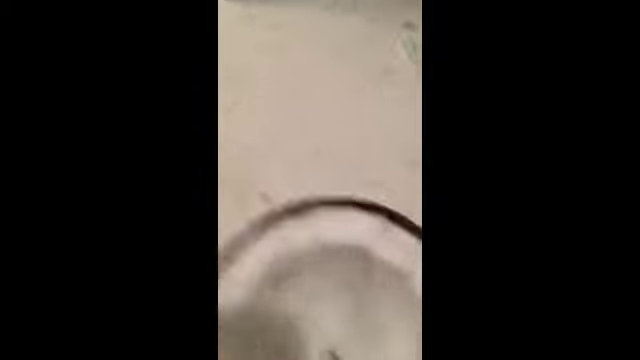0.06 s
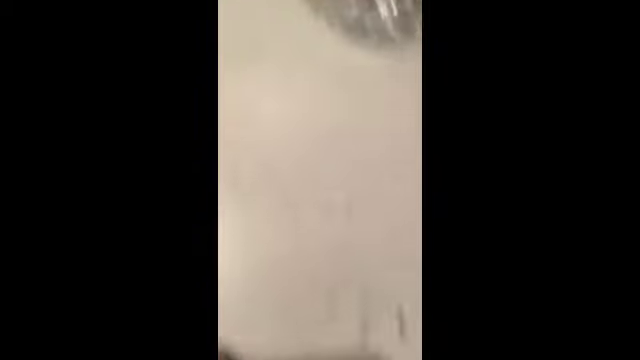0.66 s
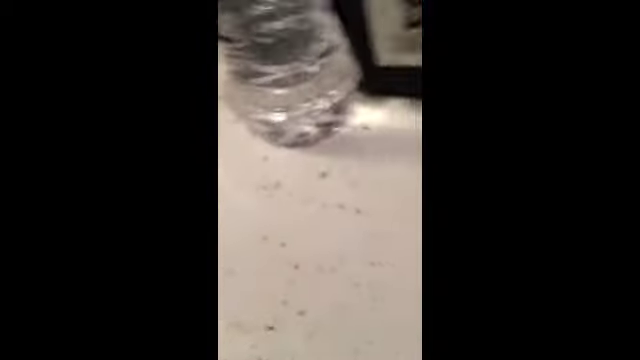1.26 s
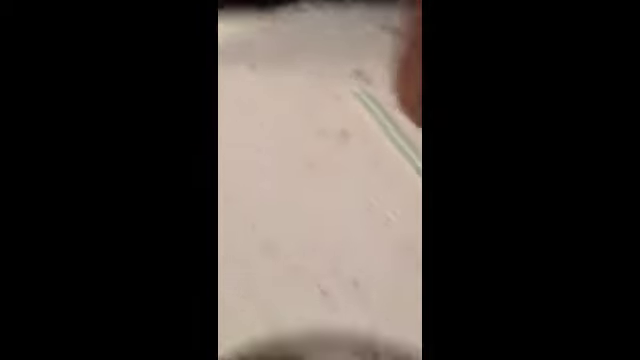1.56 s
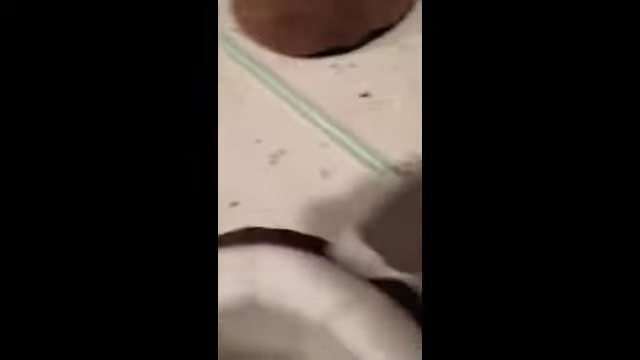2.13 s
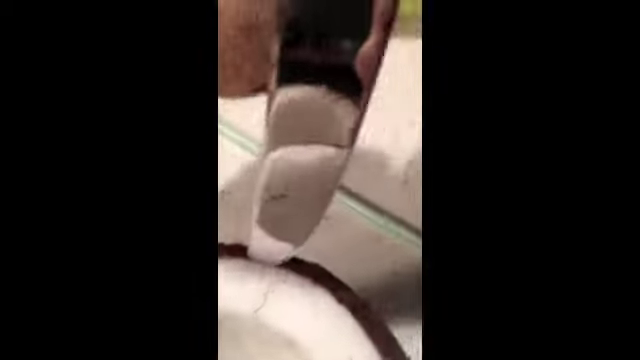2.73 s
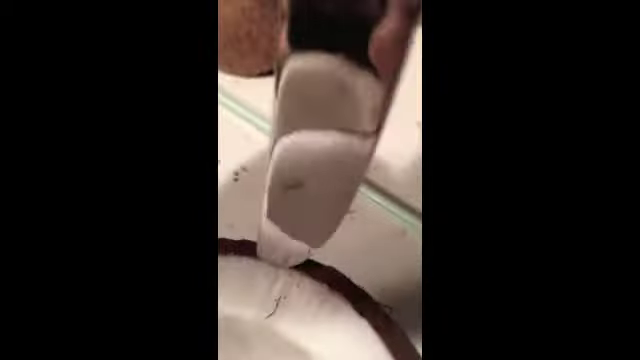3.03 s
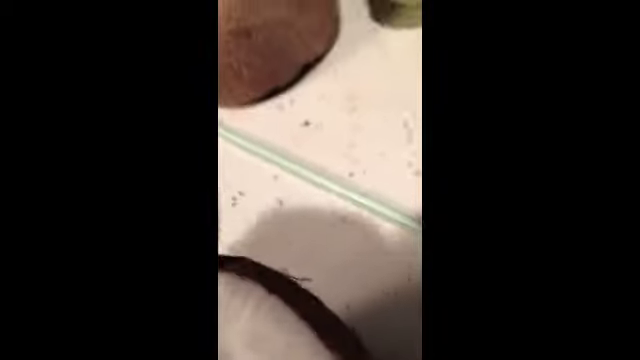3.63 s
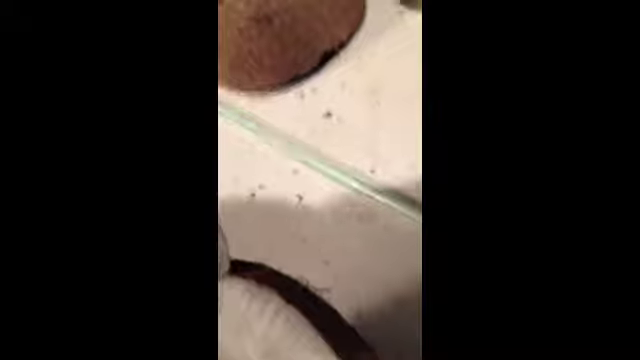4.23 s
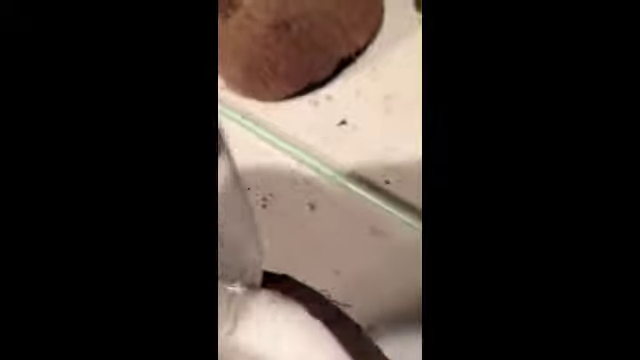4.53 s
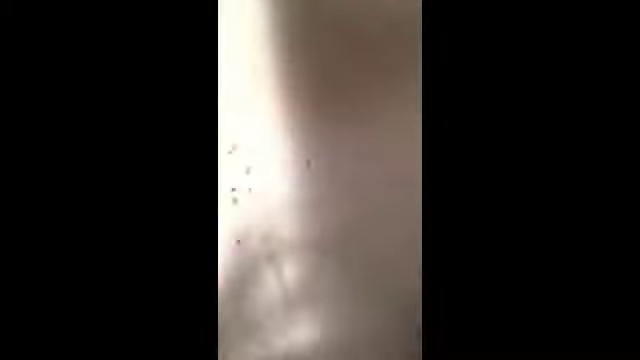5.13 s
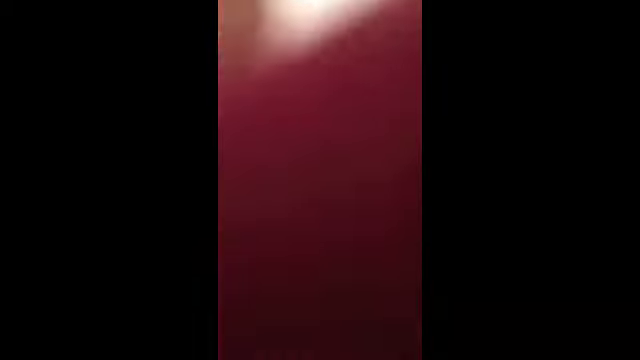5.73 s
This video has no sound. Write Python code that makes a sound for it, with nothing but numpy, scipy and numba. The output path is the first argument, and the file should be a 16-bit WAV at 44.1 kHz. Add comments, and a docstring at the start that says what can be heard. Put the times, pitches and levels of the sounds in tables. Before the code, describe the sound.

A knife scrapes into coconut flesh with a thin metallic ring, then the flesh cracks loose and the shell knocks on a counter.

```python
"""At a kitchen counter, a knife works into the flesh of a halved coconut, close to a hand-held phone.
The blade sticks and slips, which makes it ring. It sinks deeper in jerks, then levers until
the flesh tears and snaps off the shell. The shell knocks on the counter, fingers rub and bump
the phone, and the small kitchen echoes and murmurs behind."""
import sys
import numpy as np
from scipy import signal
from scipy.fft import rfft, irfft
from scipy.io import wavfile
from scipy.ndimage import uniform_filter1d
from numba import njit

SR = 44100
rng = np.random.default_rng(int(sys.argv[2]) if len(sys.argv) > 2 else 0)


def master_out(mix):
    """Clip the mix to full scale and print it as 16-bit PCM to the path in sys.argv[1]."""
    frames = np.transpose(np.atleast_2d(mix))
    ceiling = np.clip(frames, -1, 1)
    pcm = np.round(ceiling * 32767).astype(np.int16)
    wavfile.write(sys.argv[1], SR, pcm)


N = 259043
T = np.arange(N) / SR
HIT_T = T[:SR // 3]  # time within one short hit
BITE_S, SINK_S = 3.9, .68  # the blade starts to sink in; how long it takes to be buried
LEVER_S, RUPTURE_S = 4.745, 4.957  # levering starts; the flesh breaks away


def scrape():
    """The blade rings as it sticks and slips on wet flesh; sinking in damps and shifts its tones."""
    # blade tones: free f/Hz, buried f/Hz, base width/Hz, free gain/dB, buried gain/dB
    blade = [(850, 700, 390, -5, 1), (1340, 1240, 280, -8.5, -4), (2500, 3030, 240, -10.5, -6.5),
             (3990, 3930, 105, -7, -6), (4900, 4640, 165, -4.5, -11), (6340, 6780, 140, 1.5, -2),
             (6960, 7100, 580, -6, -9), (8000, 8930, 380, -3, -1), (8670, 9700, 150, 3.5, -25),
             (10040, 10700, 490, 3.5, -18), (11500, 11450, 320, 2.5, -0.5), (11900, 12600, 340, -14, 2),
             (12200, 11800, 400, -1, -1.5), (13950, 14100, 260, 1, -9), (14500, 14800, 500, -6, -3)]
    force, jerk = effort()
    depth = np.clip((T - BITE_S) / SINK_S, 0, 1)
    # the tip grates on the surface; the buried blade slides smoothly
    slips = force * (np.sqrt(1 - depth) * grains(1500, 3.3) + np.sqrt(depth) * grains(14000, 2.5))
    slips += jerk * grains(9000, 2.5)
    # a hard jerk bends the whole blade and brings out its lower tones
    slips += 1.4 * np.tanh(jerk / undb(-28)) * band(slips, 4200, 1240)
    out = undb(-9) * butter(slips, 1730, "high")
    for free_hz, buried_hz, base_width, free_db, buried_db in blade:
        hz = free_hz + depth * (buried_hz - free_hz)
        width = 2.4 * base_width * (1 + .52 * depth)
        gain = undb(free_db + depth * (buried_db - free_db))
        out += gain * band(band(slips, hz, width), hz, width)
    flesh_hiss = undb(-17) * butter(force * grains(9000, 3), 1730, "high")
    return undb(4.3) * (out + flesh_hiss)


def effort():
    """The hand's steady push, and the jerks on top of it: chatter, catches and lunges."""
    # pushes through the flesh: start t/s, length/s, level/dB, amount of chatter (0-1)
    strokes = [(3.14, .08, -65.5, .15), (3.296, .2, -61, 1), (3.497, .085, -53.5, .1), (3.6, .07, -67, .1),
               (3.724, .105, -54.5, .7), (3.929, .14, -62, .35), (4.074, .095, -56.5, .3),
               (4.17, .405, -50.5, 0), (4.58, .19, -54.5, 0)]
    # the tip catches hard and lets go: t/s, level/dB
    catches = [(3.296, -50), (3.689, -50), (3.7108, -41.5), (3.746, -40), (3.761, -42), (4.074, -50),
               (4.799, -32)]
    # the flesh gives and the blade lunges deeper: t/s, level/dB, rise/s
    lunges = [(4.215, -25.5, .002), (4.224, -31, .0055), (4.366, -33.5, .015), (4.719, -34, .007)]
    chatter_hz, slip_fall_s = 52, .0026
    force, jerk = np.zeros(N), np.zeros(N)
    cycles = np.cumsum(chatter_hz * (1 + .2 * walk(40))) / SR
    for s, length, db, chatter in strokes:
        force += undb(db) * held(s, length, attack=.008, release=.018)
        since_slip = (cycles - cycles[int(s * SR)]) % 1 / chatter_hz
        pushing = (T >= s) & (T < s + length)
        jerk += chatter * undb(db + 10) * np.exp(-since_slip / slip_fall_s) * pushing
    jerk += sum(undb(db) * swell(s, .0004, slip_fall_s) for s, db in catches)
    for s, db, rise in lunges:
        jerk += undb(db) * swell(s, rise, 1.25 * rise)
        force += undb(db - 21) * swell(s, .022, .022)  # the blade creeps before and after
    return force * undb(2 * walk(160)), jerk


def tear():
    """Fibres part in a dense crackle; the bigger breaks make the hollow shell ring."""
    # smaller rips before and after the main break: t/s, level/dB, rise/s, fall/s
    small_rips = [(3.52, -57, .018, .05), (4.775, -43, .01, .015), (5.033, -38, .025, .008),
                  (5.08, -38, .008, .022)]
    fibres, breaks = grains(3500, 3.2), grains(1200, 3.1)
    hollow = band(breaks, 524, 230) + 1.06 * band(breaks, 924, 280)
    hollow += .2 * band(breaks, 1570, 410) + .21 * band(breaks, 2420, 400)
    deep = unit(butter(hollow, 200, "high"))
    fine = unit(butter(band(fibres, 8500, 12000), 1100, "high"))
    deep_level = strain(hold_db=-43, peak_db=-21.5, rise=.022, fall=.02)
    deep_level += sum(undb(db) * swell(s, rise, fall) for s, db, rise, fall in small_rips)
    fine_level = strain(hold_db=-44.5, peak_db=-29, rise=.042, fall=.016)
    return deep * deep_level + fine * fine_level


def strain(hold_db, peak_db, rise, fall):
    """The crackle's loudness holds while the knife levers, swells to the break and dies away."""
    lever = held(LEVER_S, RUPTURE_S - LEVER_S, attack=.045, release=.09)
    return lever * (undb(hold_db) + undb(peak_db) * swell(RUPTURE_S, rise, fall))


def snaps():
    """Each crack is a sharp click with a few milliseconds of splintering behind it."""
    # snaps of flesh and ticks of the knife tip: t/s, relative level/dB, fade time/s, centre f/Hz
    cracks = [(2.2428, -47.5, .008, 4200), (2.955, -48, .02, 7500), (3.155, -51.5, .041, 7500),
              (4.8794, -11.5, .016, 9000), (4.8965, -9, .027, 6900), (4.939, -12, .0057, 6100),
              (4.9478, -11.5, .022, 3900), (4.9595, -7.5, .007, 4500), (4.971, -11, .009, 5200),
              (4.990, -15, .015, 5300), (5.0136, -12, .0045, 5600), (5.0327, -9, .005, 5600),
              (5.068, -31.5, .014, 4800), (5.0903, -6.5, .0054, 3500), (5.101, -15, .007, 4200),
              (5.271, -27, .0073, 3500), (5.297, -34, .014, 2430)]
    out = np.zeros(N)
    for s, db, t60, hz in cracks:
        shape = fade(HIT_T, t60)
        burst = rng.standard_normal(len(HIT_T)) * shape
        burst[0] -= 4  # the click
        burst = butter(band(burst, hz, 1.9 * hz), .13 * hz, "high")
        add(out, s, undb(db) * burst * np.linalg.norm(shape) / np.linalg.norm(burst))
    splinters = unit(band(grains(170, 3), 4500, 7000))
    near_break = np.exp(-.5 * ((T - RUPTURE_S) / .022) ** 2)
    out += undb(-29) * splinters * near_break
    # the flesh colours every snap alike
    return .55 * out + .31 * band(out, 2640, 760) + .3 * band(out, 8300, 2400)


def pings():
    """Each light tap is a tick and one fading tone, roughened by the grit under the tip."""
    # taps and catches: t/s, tone level/dB, tone f/Hz, tick level/dB
    taps = [(.757, -54, 2450, -58), (1.686, -54, 1450, -47.5), (2.503, -59, 1410, -46),
            (2.7415, -48, 1224, -40), (2.789, -54, 1210, -50), (2.816, -61, 1250, -51),
            (3.178, -52, 1980, -50), (4.214, -37, 1670, -45), (4.2145, -31, 3970, -36),
            (4.2147, -29, 4720, -36), (4.8395, -25, 1005, -34), (4.897, -16.5, 6900, -22),
            (4.9213, -26, 4200, -29), (4.9215, -20.5, 2265, -20), (4.929, -20, 2365, -22)]
    ring_s, tick_s, tick_hz = .03, .032, 4000
    out = np.zeros(N)
    for s, db, hz, tick_db in taps:
        contact = .15 * noise_burst(tick_s)
        contact[0] += 1
        tone = band(contact, hz, width=np.log(1000) / (np.pi * ring_s))
        tick = band(noise_burst(tick_s), tick_hz, 2.2 * tick_hz)
        add(out, s, at_peak(tone, db) + at_peak(tick, tick_db))
    return out


def clacks():
    """The blade slips against the hard shell, and the short rough contact rings."""
    # blade hits on the shell: t/s, peak level/dB, pitch ratio, brightness f/Hz, contact fade time/s
    hits = [(.757, -49, 0.99, 1510, 0.035), (4.8963, -8, 0.93, 14000, 0.024),
            (5.1457, -10.5, 0.985, 3600, 0.016)]
    # the tones they ring: f/Hz, base width/Hz, gain/dB
    tones = [(840, 110, 7), (2380, 70, -2), (3670, 100, -9), (4760, 120, 1), (5700, 91, -13),
             (7230, 220, -4), (8200, 110, -8), (9310, 130, -8), (10400, 110, -18), (12200, 160, -19),
             (13700, 130, -22), (14700, 130, -24)]
    out = np.zeros(N)
    for s, db, pitch, bright_hz, t60 in hits:
        contact = .25 * noise_burst(t60)
        contact[0] += 1
        ring = sum(undb(gain) * band(contact, hz * pitch, 1.06 * width) for hz, width, gain in tones)
        sound = band(.082 * contact + ring, bright_hz, 3.8 * bright_hz)
        add(out, s, at_peak(sound, db))
    return out


def knocks():
    """Dull knocks pass through shell, counter and hand; harder ones reach the higher tones."""
    # knocks: t/s, peak level/dB, hardness as a cutoff f/Hz, ring length ratio
    blows = [(.756, -38.5, 620, 1.03), (.868, -43, 294, .87), (1.471, -45, 250, 2.7),
             (1.6442, -29, 220, .9), (3.116, -40, 300, 1), (4.214, -24, 290, 1.1), (4.341, -34, 70, .83),
             (4.356, -35, 800, 1.1), (4.719, -28, 260, 1.13), (4.772, -35, 500, 2), (4.82, -24.5, 590, 1.9),
             (4.856, -18, 400, 1.2), (4.877, -10, 110, .33), (4.897, -23, 350, 1.8), (4.95, -23, 450, 1.9),
             (4.991, -16, 253, 1.25), (5.033, -20, 450, .7), (5.071, -19, 280, .9), (5.103, -29, 280, 2),
             (5.146, -25, 650, 1.1), (5.2288, -13, 250, .85), (5.4015, -4, 500, .87), (5.46, -21, 230, .66)]
    # the tones they ring: base f/Hz, relative level/dB, base fade time/s
    tones = [(115, -23.5, 0.23), (173.7, -1.5, 0.082), (240.4, 1.5, 0.067), (292.3, 9.5, 0.068),
             (356.8, -2, 0.068), (458.4, 0.5, 0.063), (542, -7, 0.071), (718, -16, 0.075), (854, -5, 0.064),
             (1046, -10.5, .04), (292, -34, 0.23), (354, -24, 0.52)]
    out = np.zeros(N)
    for s, peak_db, hardness_hz, length in blows:
        pitch = (hardness_hz / 420) ** .07  # a softer blow rings a little lower
        ring = np.zeros(len(HIT_T))
        for hz, db, t60 in tones:
            gain = undb(db + rng.standard_normal())  # each blow lands on another spot
            ring += gain * np.sin(2 * np.pi * hz * pitch * HIT_T) * fade(HIT_T, t60 * length)
        sound = butter(ring, hardness_hz, "low", order=1)
        sound *= 1 - np.exp(-HIT_T / (.0024 * length))  # the weight takes a moment to settle
        sound = butter(sound, 138 * pitch, "high", order=3)  # a small body gives off little bass
        add(out, s, at_peak(sound, peak_db))
    return out


def skid():
    """At the hardest bump the shell scuffs as it lands, again as it bounces, and then settles."""
    bump_s, bounce_gap_s = 5.402, .019
    scuff = unit(butter(band(grains(6000, 4), 780, 540), 3100, "low"))
    landings = swell(bump_s, .0006, .008) + undb(-5) * swell(bump_s + bounce_gap_s, .003, .008)
    settling = swell(bump_s + bounce_gap_s, .003, .05)
    return scuff * (undb(-22.5) * landings + undb(-50) * settling)


def fingers():
    """Skin slides on the phone's case in a thin, unsteady squeak; the hand brushes by."""
    # tones of the squeak: f/Hz, width/Hz, gain/dB
    tones = [(4620, 160, 5), (7250, 280, -4), (9000, 550, -4), (11050, 250, -4), (12100, 220, -3),
             (13850, 200, 0), (14900, 300, -9)]
    # finger rubs: peak t/s, relative level/dB, rise and fall/s
    rubs = [(1.086, -58.5, .007), (1.308, -67, .012), (1.44, -59, .02), (1.465, -57.5, .012),
            (1.492, -57, .015), (1.558, -64, .004)]
    # the hand brushing past: peak t/s, level/dB, rise/s, fall/s
    brushes = [(1.635, -66, .025, .025), (2.04, -62, .025, .05), (2.223, -61, .001, .004),
               (5.24, -49, .028, .09), (5.415, -56, .005, .12), (5.647, -58, .004, .035),
               (5.831, -58, .025, .04)]
    friction = grains(5000, 2.7) * undb(2.2 * walk(110))
    wobble = 1 + .012 * walk(45.4)
    squeak = unit(sum(undb(db) * band(friction, hz * wobble, width) for hz, width, db in tones))
    hiss = unit(butter(friction, 3100, "high"))
    rub_level = sum(undb(db) * swell(s, rise, rise) for s, db, rise in rubs)
    grip = unit(band(band(grains(400, 3.5), 6900, 9300), 7000, 12000))
    grip *= undb(-83 + 4 * walk(12))  # the grip shifts softly
    brush = unit(band(grains(3000, 3.6), 7400, 15300))
    brush_level = sum(undb(db) * swell(s, rise, fall) for s, db, rise, fall in brushes)
    return (.8 * squeak + .4 * hiss) * rub_level + grip + brush * brush_level


def room(x, low_db, high_db, low_t60, high_t60):
    """Add the echo of a small room: the lows linger, the highs die fast."""
    t = T[:SR]
    onset = 1 - np.exp(-(t / .0095) ** 2)
    low, high = (rng.standard_normal(SR) * onset * fade(t, t60) for t60 in (low_t60, high_t60))
    tail = undb(low_db) * butter(low / np.linalg.norm(low), 1270, "low")
    tail += undb(high_db) * butter(high / np.linalg.norm(high), 890, "high")
    return x + signal.fftconvolve(x, tail)[:N]


def kitchen():
    """The room murmurs low and steady over a thin hiss."""
    # how strong the murmur is from low to high: f/Hz, relative level/dB
    spectrum = [(18, -62), (30, -30), (85, -44), (105, -5.5), (126, 4), (160, -1), (399, -4), (432, -10.5),
                (467, -9), (656, -14.5), (970, -16.5), (2360, -27.5), (4660, -29), (6050, -34),
                (15500, -34)]
    hz, db = np.transpose(spectrum)
    bins = np.maximum(np.fft.rfftfreq(N, 1 / SR), 1)
    colour = undb(np.interp(np.log(bins), np.log(hz), db))
    murmur = unit(irfft(rfft(rng.standard_normal(N)) * colour, N))
    return murmur * undb(-57.5 + .5 * walk(9))


def undb(db):
    """Turn decibels into a gain."""
    return 10 ** (np.asarray(db) / 20)


def unit(x):
    """Scale to an average strength (rms) of 1."""
    return x / np.sqrt(np.mean(x ** 2))


def at_peak(x, db):
    """Scale so the highest peak is at db."""
    return undb(db) * x / np.abs(x).max()


def add(track, s, sound):
    """Mix a sound in at s seconds."""
    start = int(s * SR)
    track[start:start + len(sound)] += sound[:N - start]


@njit
def svf(x, tuning, damping):
    """Band-pass filter whose centre and damping can move."""
    y, mid, low = np.empty(len(x)), 0., 0.
    for i in range(len(x)):
        g, k = tuning[i], damping[i]
        v = (mid + g * (x[i] + 1e-18 - low)) / (1 + g * (g + k))
        mid, low, y[i] = 2 * v - mid, low + 2 * g * v, k * v
    return y


def band(x, hz, width):
    """Keep a band around hz, with gain 1 at its centre and a width in Hz."""
    turn = np.pi * np.minimum(hz, SR * 3 / 7) / SR * np.ones(len(x))
    return svf(x, np.tan(turn), 2 * np.pi * width / SR / np.sin(2 * turn))


def butter(x, hz, kind, order=2):
    """Keep what is below ("low") or above ("high") hz."""
    return signal.sosfilt(signal.butter(order, min(hz, SR / 2 - 1), kind, fs=SR, output="sos"), x)


def fade(t, t60):
    """Die away by 60 dB in the fade time t60."""
    return np.exp(-np.log(1000) * t / t60)


def noise_burst(t60):
    """A short puff of fading noise."""
    return rng.standard_normal(len(HIT_T)) * fade(HIT_T, t60)


def swell(s, rise, fall):
    """A loudness curve that grows to 1 at s seconds and dies away."""
    return np.exp(-np.minimum(np.abs(T - s) / np.where(T < s, rise, fall), 50))


def held(s, length, attack, release):
    """A loudness curve that ramps up, holds and dies away."""
    return np.clip((T - s) / attack, 0, 1) * swell(s + length, np.inf, release)


def walk(rate):
    """A random wander of size near 1, with rate turns a second."""
    step = int(SR / rate)
    return unit(uniform_filter1d(np.repeat(rng.standard_normal(N // step + 1), step), step)[:N])


def grains(rate, spread_db):
    """Tiny clicks of uneven size, about rate of them a second."""
    size = undb(spread_db * np.clip(rng.standard_normal(N), -2, 2))
    return unit((rng.random(N) < rate / SR) * size * rng.choice([-1, 1], N))


def scene():
    """The close sounds echo in the kitchen, over its murmur."""
    close = scrape() + tear() + snaps() + pings() + clacks() + knocks() + skid() + fingers()
    return (room(close, low_db=-14, high_db=-35.5, low_t60=.54, high_t60=.28) + kitchen())[None]


def record(dry):
    """The phone drops the deep bass and cuts the highest treble."""
    thin = butter(dry, 118, "high", order=3)
    return signal.sosfilt(signal.ellip(8, .2, 70, 15300, fs=SR, output="sos"), thin)


dry = scene()
out = record(dry)
master_out(out)
```